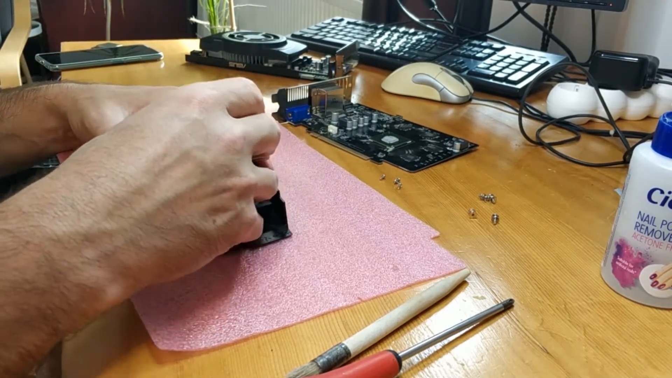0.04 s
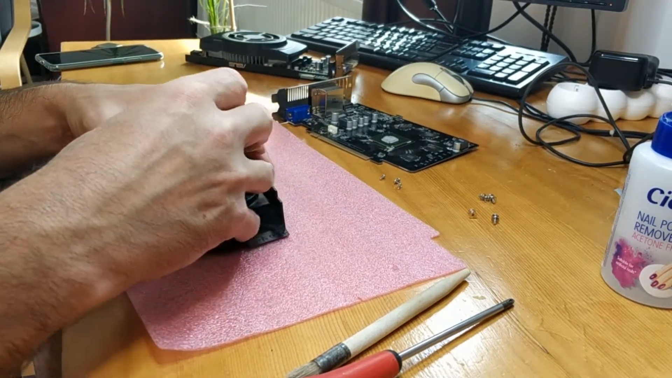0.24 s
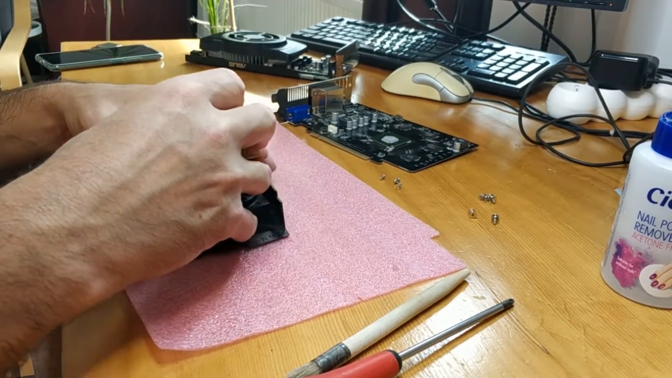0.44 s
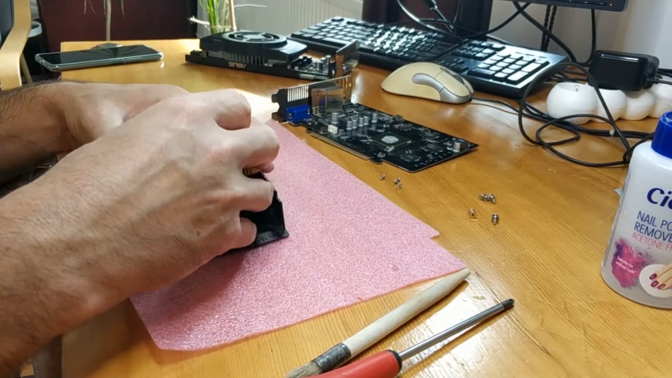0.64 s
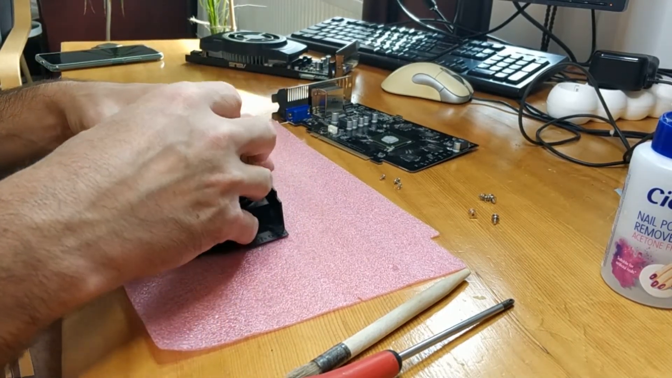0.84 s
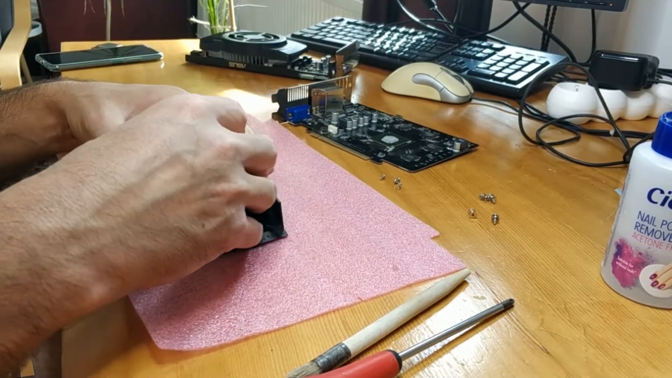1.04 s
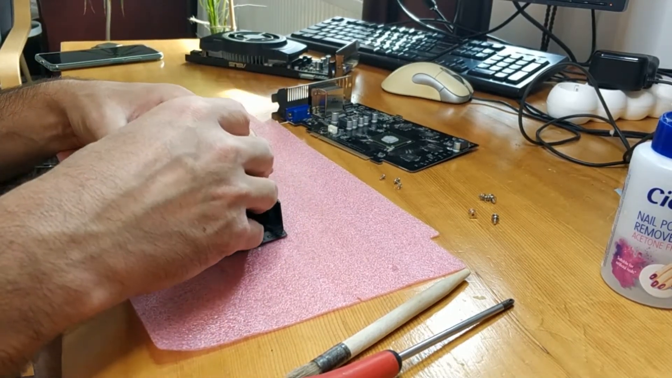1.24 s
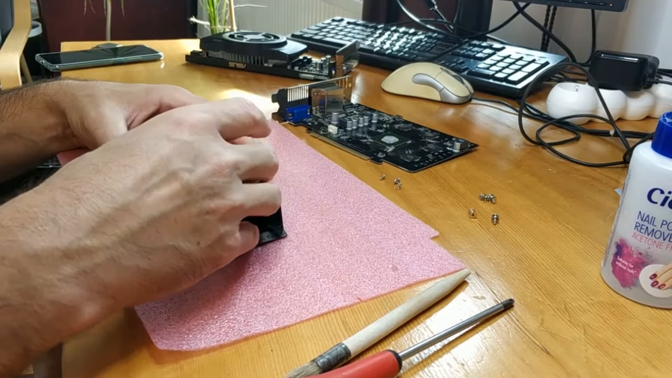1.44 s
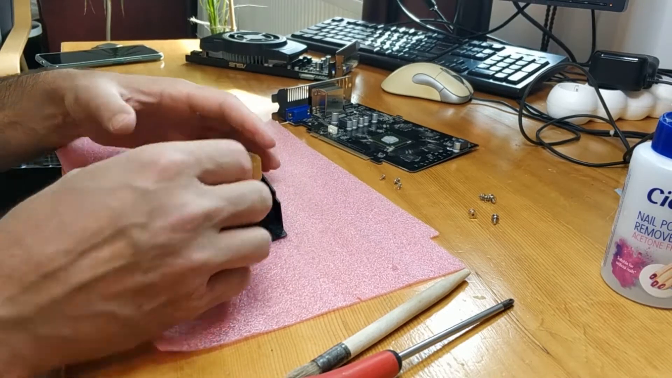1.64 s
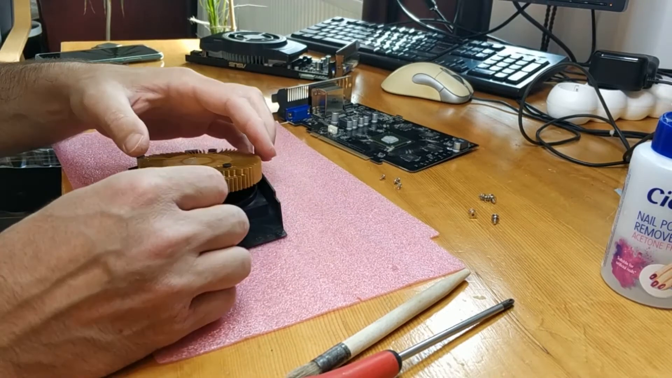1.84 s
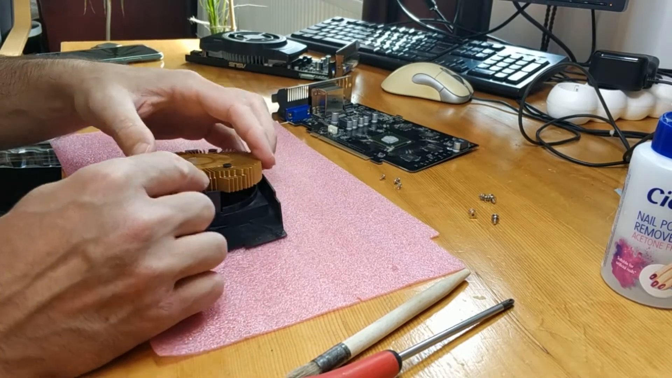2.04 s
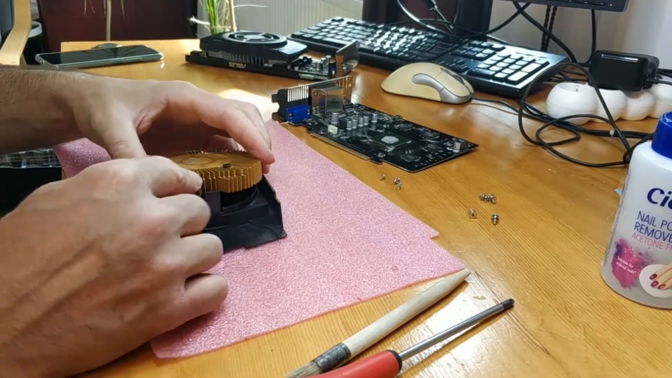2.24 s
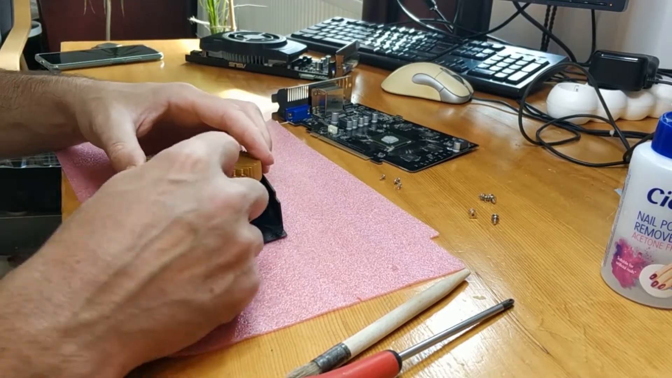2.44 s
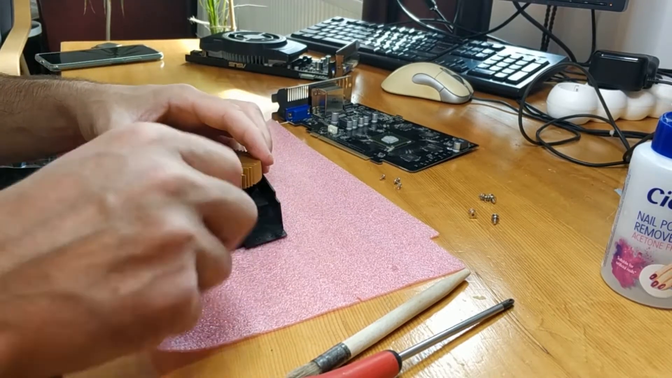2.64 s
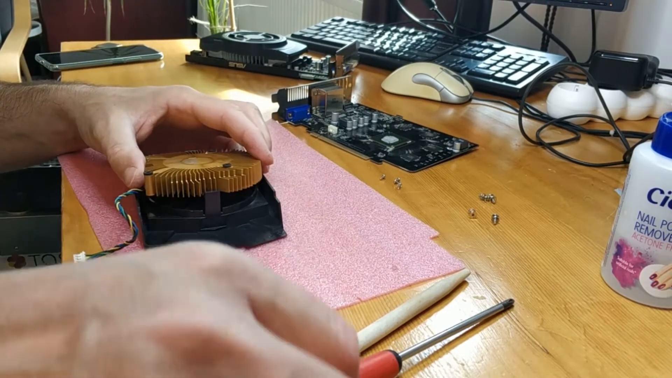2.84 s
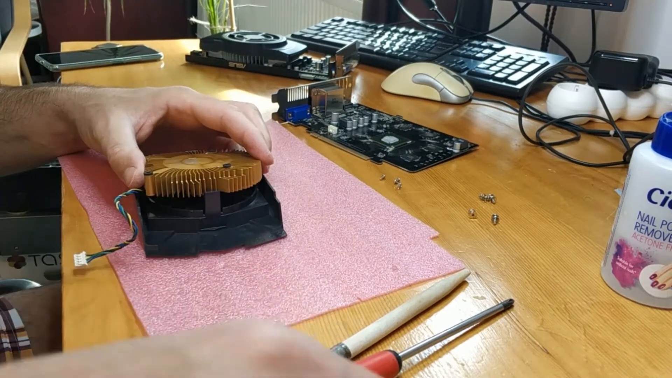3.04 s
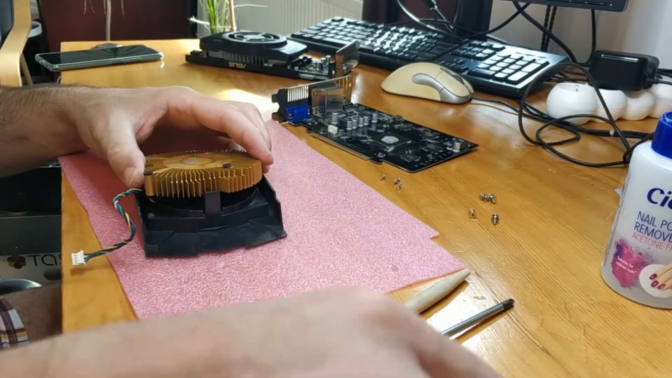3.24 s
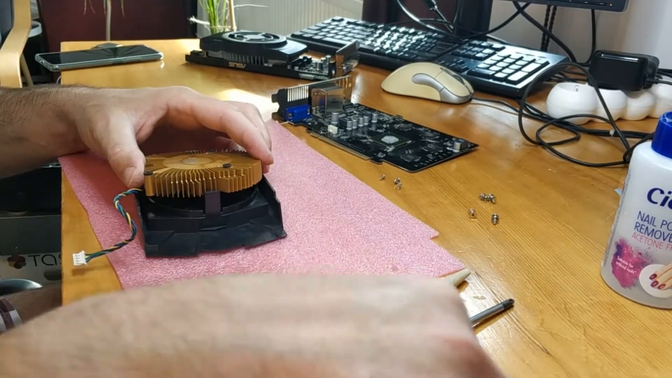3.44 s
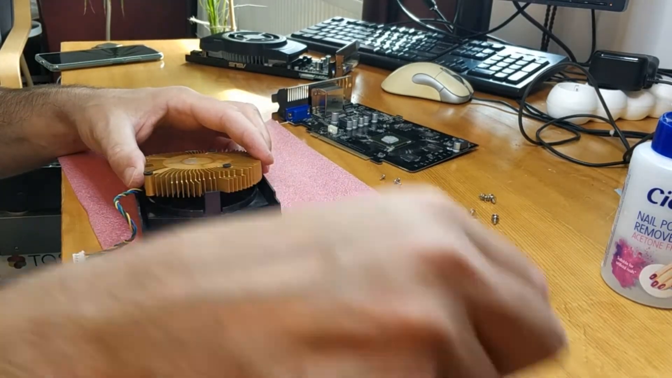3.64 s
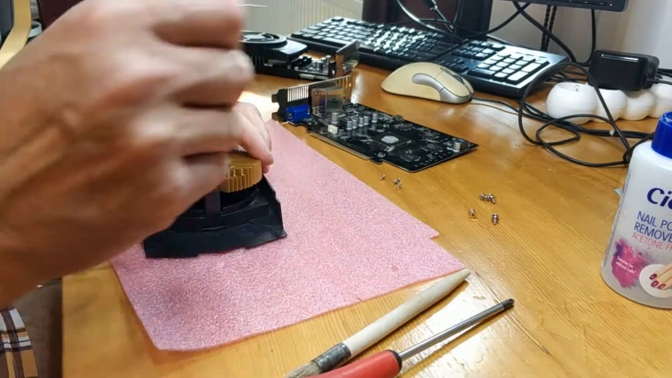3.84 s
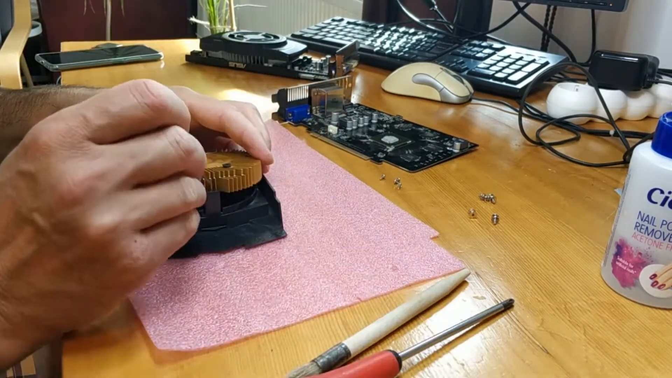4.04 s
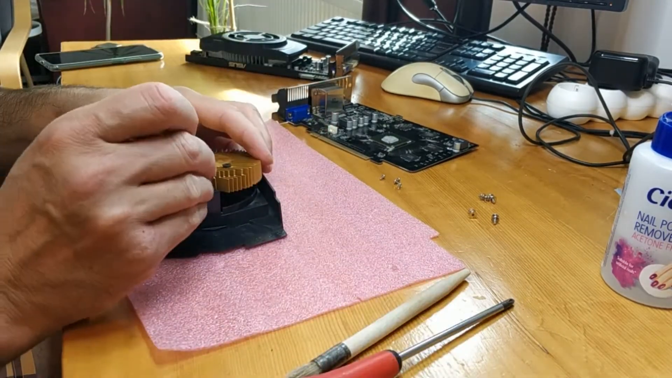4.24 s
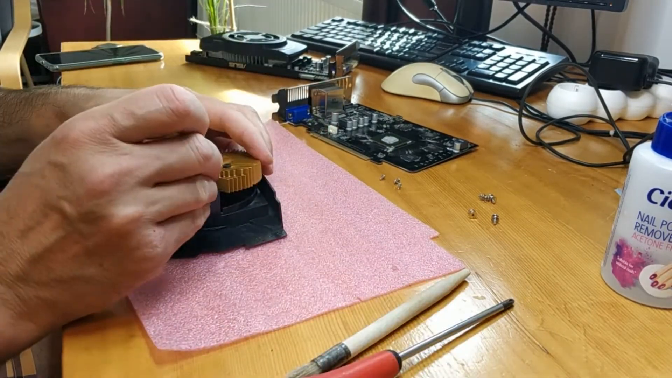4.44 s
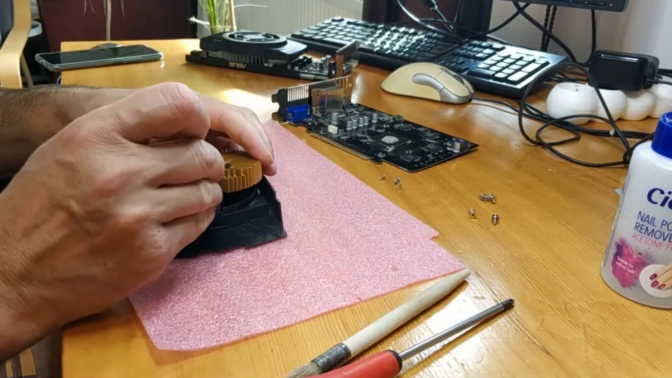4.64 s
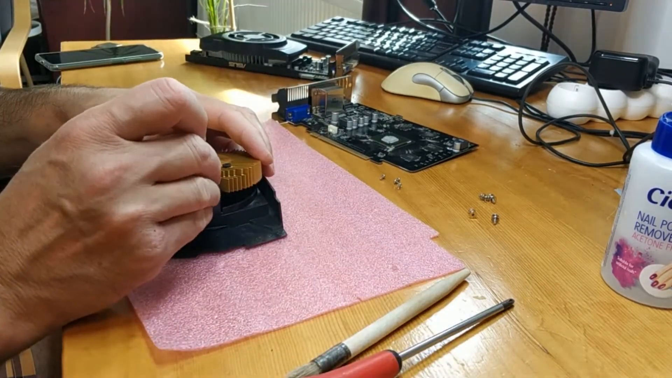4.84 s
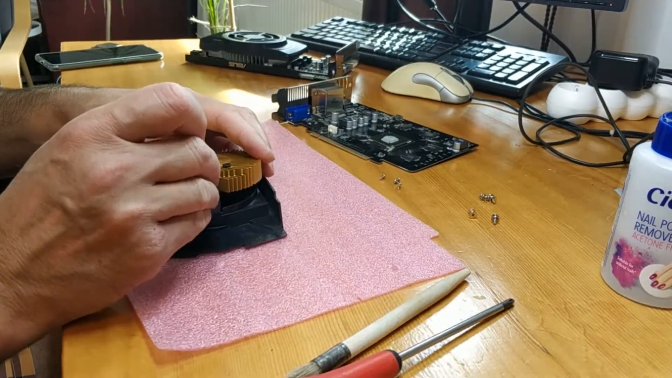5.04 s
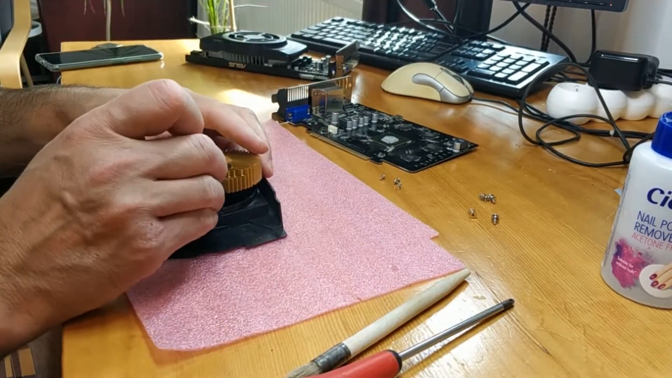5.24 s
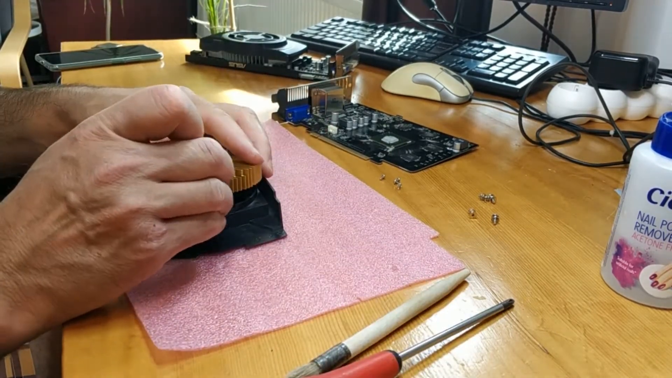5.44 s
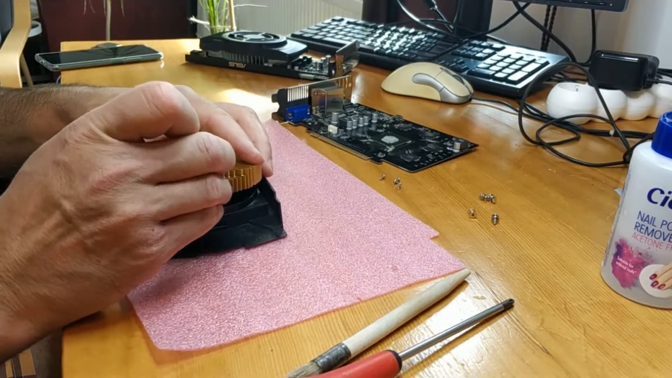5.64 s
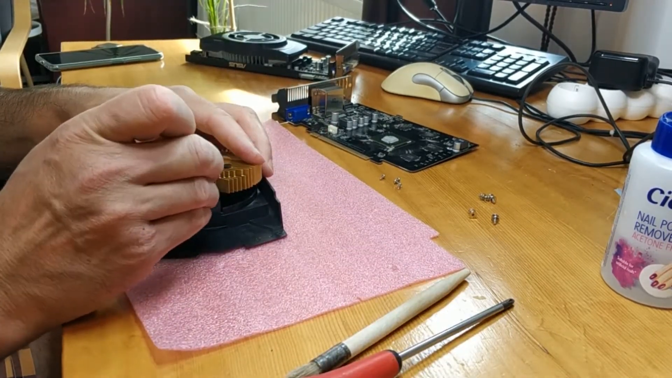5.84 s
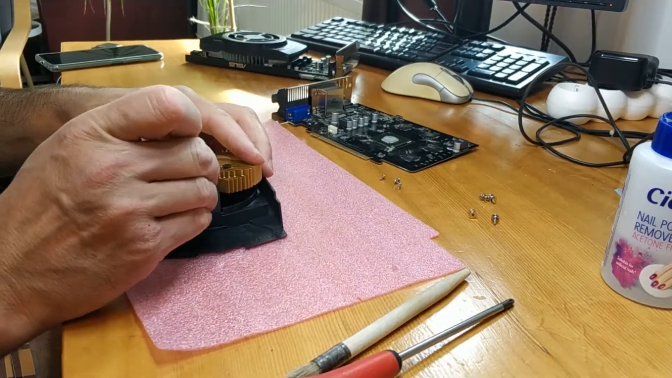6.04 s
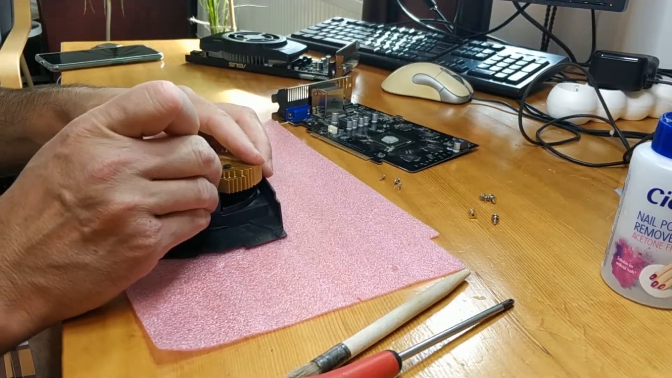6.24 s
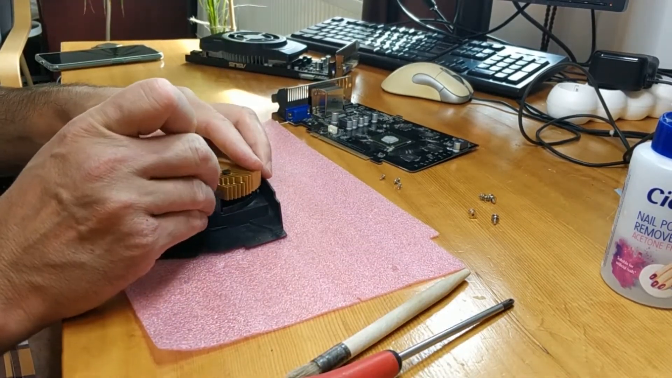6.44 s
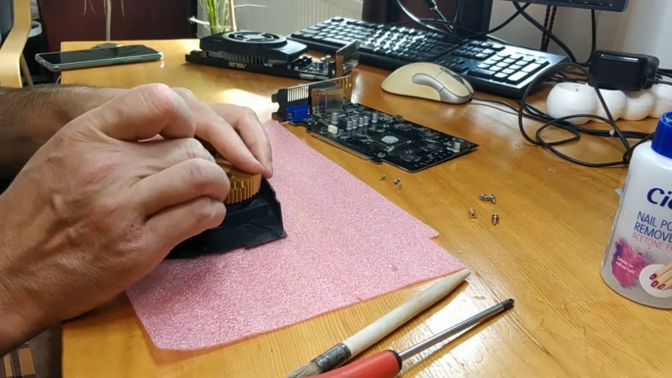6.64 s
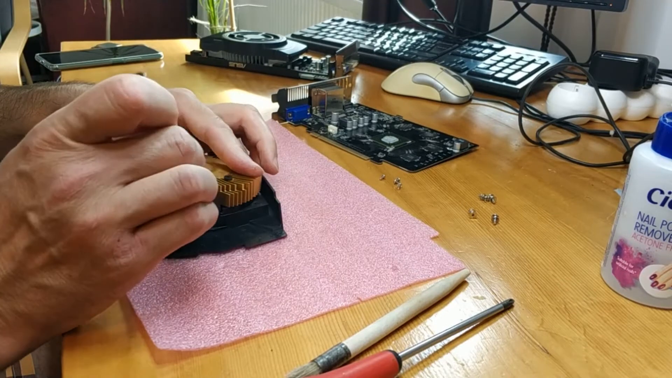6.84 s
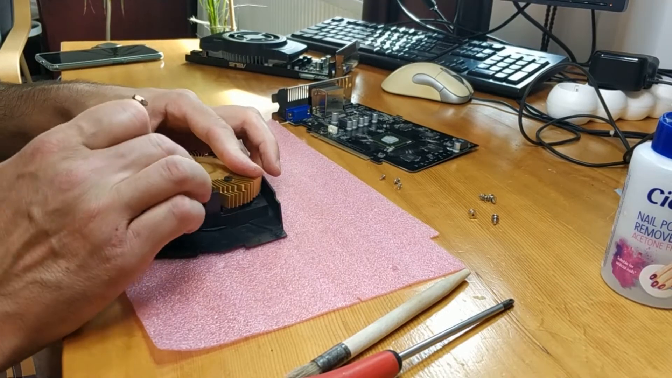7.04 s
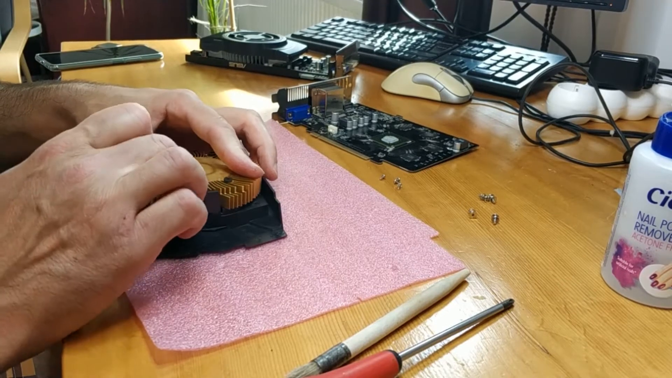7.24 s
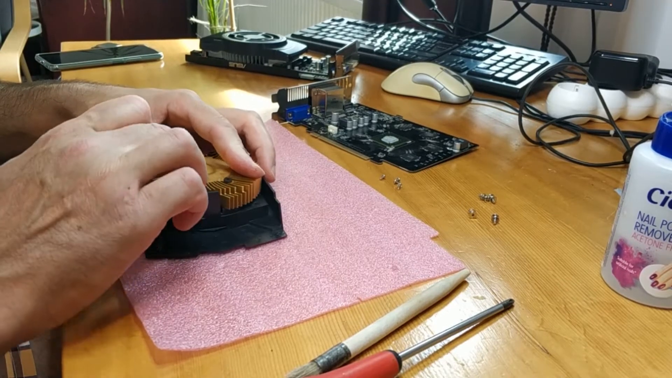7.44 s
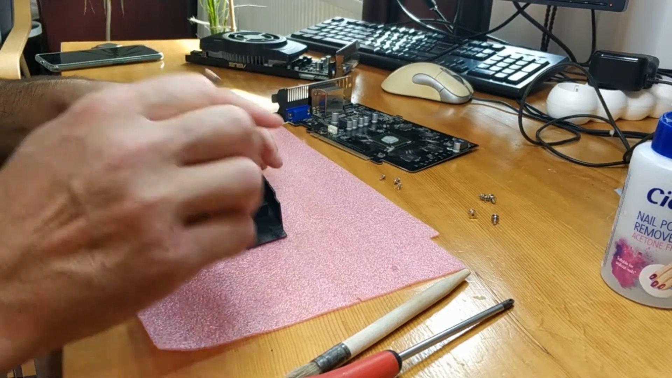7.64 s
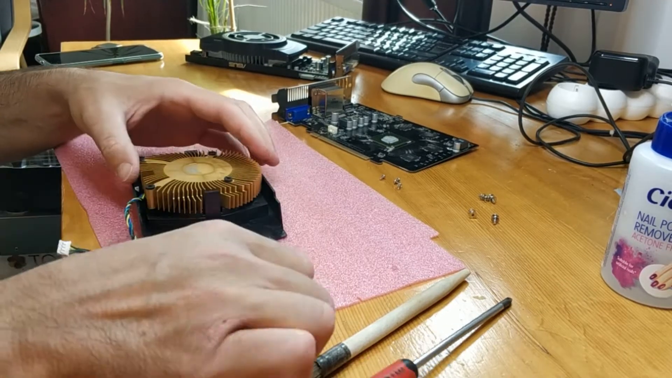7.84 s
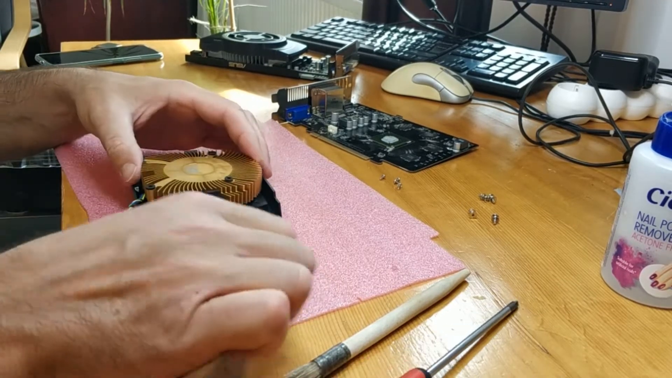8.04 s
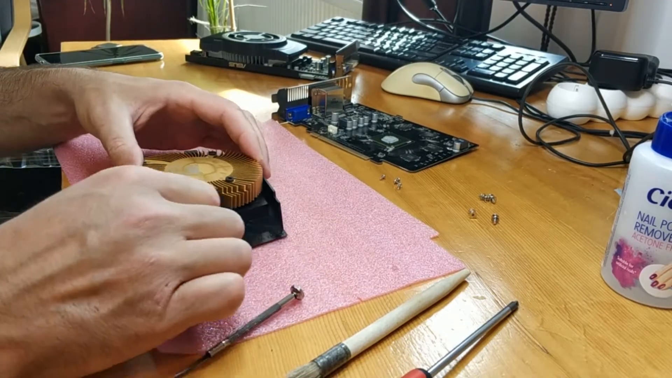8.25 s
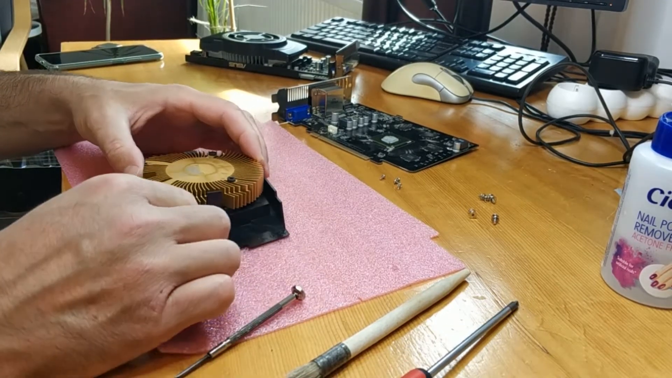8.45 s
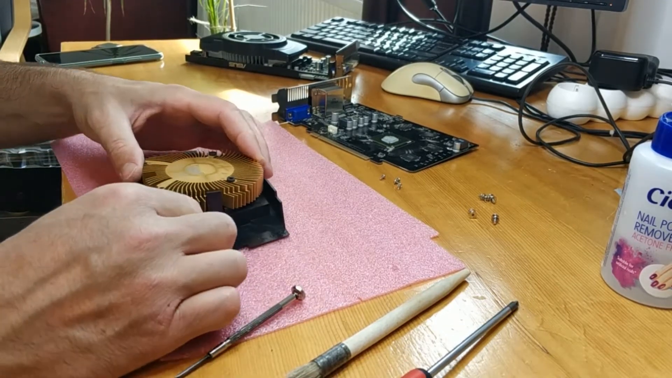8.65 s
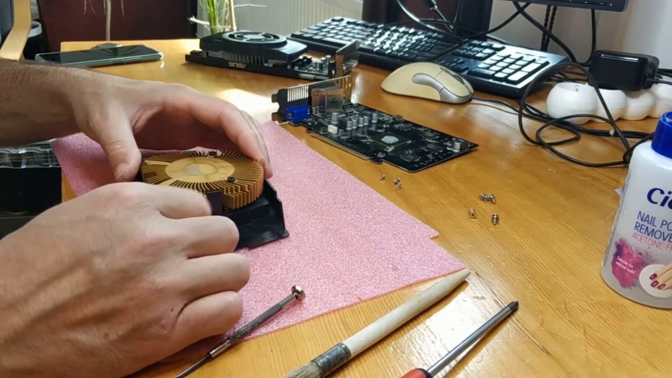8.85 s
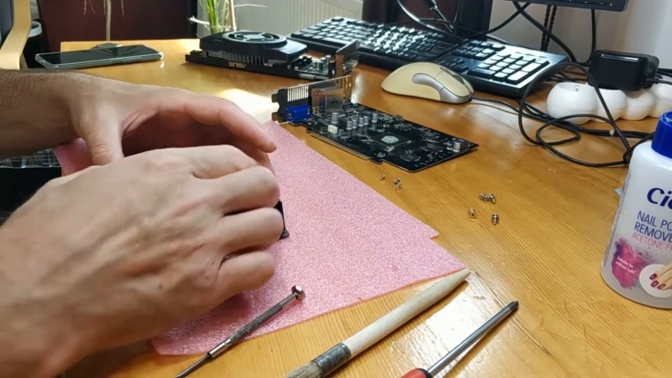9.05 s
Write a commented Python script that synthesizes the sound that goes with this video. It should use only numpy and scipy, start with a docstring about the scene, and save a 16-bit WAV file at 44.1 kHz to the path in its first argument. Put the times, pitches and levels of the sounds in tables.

```python
"""A quiet room hums around two spaced microphones while hands work at a plastic fan shroud and its metal
heatsink on a soft mat: skin rubs, clips snap, steel ticks and rings, and knocks thump through to the desk.
A faint whistle falls, then near 3.5 s a small screwdriver is picked up, its handle bumping and scraping.
More ticks and presses lead to the loudest snap at 7.2 s. Near 7.9 s the tool drops on the bare desk,
clatters and rocks to rest, and the fingers slide on softly."""
import sys
import numpy as np
from scipy import signal
from scipy.fft import rfft, irfft, next_fast_len
from scipy.io import wavfile
from scipy.ndimage import map_coordinates

SR = 44100
rng = np.random.default_rng(int(sys.argv[2]) if len(sys.argv) > 2 else 0)


def generate_wav(signal):
    """Clip the signal to [-1, 1] and save it as 16-bit WAV at the path in sys.argv[1]."""
    frames = np.transpose(np.atleast_2d(signal))
    scaled = np.clip(frames, -1, 1) * 32767
    pcm = np.round(scaled).astype(np.int16)
    wavfile.write(sys.argv[1], SR, pcm)


N = 401751
LEFT_LAG = 6  # samples by which the left microphone hears the work later
# hollow modes of the desk top and tool handle: pitch_hz, level_db, t60_s
HOLLOW_MODES = [(200, -6, 0.11), (310.5, -0.5, 0.047), (366.6, -22, 0.5), (555.4, -10.5, 0.076),
                (680, 6, 0.027), (843, -4, 0.05), (920, 0.5, 0.021), (1033, -4, 0.044), (1250, -7, 0.063),
                (1600, -16.5, 0.11), (1820, -14.5, 0.039), (2390, -9.5, 0.023), (3420, -23, 0.041)]


def amp(db):
    """Decibels to gain."""
    return 10 ** (np.asarray(db) / 20)


def unit(x):
    """Scales x to an rms of 1."""
    return x / np.sqrt(np.mean(x ** 2) + 1e-20)


def along(points, hz):
    """Reads a curve of (Hz, value) points on a log frequency axis."""
    freqs, values = np.transpose(points)
    return np.interp(np.log(hz + 1), np.log(freqs + 1), values)


def filtered(x, response):
    """Shapes x with a complex frequency response."""
    n = x.shape[-1]
    size = next_fast_len(n + 8192)
    return irfft(rfft(x, size) * response(np.fft.rfftfreq(size, 1 / SR)), size)[..., :n]


def peak(f, hz, width_hz):
    """The response of one causal resonance."""
    return 1j * f * width_hz / (hz * hz - f * f + 1j * f * width_hz)


def wobble(rate):
    """A smooth random curve with rate knots a second."""
    knots = rng.standard_normal(int(N * rate / SR) + 4)
    coarse = np.arange(0, N + 16, 16)
    return np.interp(np.arange(N), coarse, map_coordinates(knots, [coarse * rate / SR]))


def echo(x):
    """A fresh room tail for each event: every frequency dies at its own speed, and little bass returns."""
    # room decay: freq_hz, t60_s
    decay = [(200, 0.64), (1000, 0.23), (4000, 0.36), (8000, 0.32), (14000, 0.11)]
    hz, t = np.fft.rfftfreq(256, 1 / SR), np.arange(100) * 128 / SR
    real, imag = rng.standard_normal((2, 2, len(hz), len(t)))
    envelope = amp(-60 * t / along(decay, hz)[:, None]) * (hz / (hz + 500))[:, None]
    tail = signal.istft((real + 1j * imag) * envelope, SR, nperseg=256)[1]
    predelayed = np.pad(x, ((0, 0), (200, 0)))
    return signal.fftconvolve(predelayed, tail / np.linalg.norm(tail[0]), axes=1)


def place(out, start_s, pair, pan_db, room_db, lag=LEFT_LAG):
    """Mixes in a stereo event, its bounce off nearby things and its echo; positive pan is left."""
    at, n = round(start_s * SR), pair.shape[1]
    event = amp(room_db) * echo(pair)
    event[0, lag:lag + n] += amp(pan_db / 2) * pair[0]
    event[1, :n] += amp(-pan_db / 2) * pair[1]
    event[:, round(.0035 * SR):][:, :n] += amp(-7.5) * pair[::-1]  # the bounce swaps sides
    out[:, at:at + event.shape[1]] += event


def ring(modes, attack_s, strengths_db=0):
    """One blow on a set of decaying modes, each at a new strength, a little different on each side."""
    t = np.arange(SR // 4) / SR
    hz, db, t60 = np.transpose(modes)[:, :, None]
    scatter_db = rng.normal(0, 2, hz.shape) + rng.normal(0, 1.5, (len(modes), 2))
    gains = amp(db + np.reshape(strengths_db, (-1, 1)) + scatter_db)
    partials = amp(-60 * t / t60) * np.sin(2 * np.pi * hz * t)
    return gains.T @ partials * (1 - np.exp(-t / attack_s))


def strokes(rows, shares=1):
    """A gain envelope: each stroke swells, drifts from its first level to its last, and lets go."""
    attack_s, release_s, fade_db = 0.033, 0.056, 24.5
    gain = np.zeros(N)
    for (s, length, db, change_db, *_), share in zip(rows, shares * np.ones(len(rows))):
        times = [s - attack_s, s, s + length, s + length + release_s]
        levels_db = [db - fade_db, db, db + change_db, db + change_db - fade_db]
        at = np.arange(max(0, round(times[0] * SR)), min(N, round(times[-1] * SR)))
        gain[at] += share * amp(np.interp(at / SR, times, levels_db))
    return gain


def grit(spiky_db):
    """Dense stick-slip grains of uneven size; some slips stand out and reach both sides together."""
    slips = (rng.random(N) < 120 / SR) * rng.exponential(size=N)
    bursts = 1 + .7 * signal.fftconvolve(slips, np.exp(-np.arange(300) / 60))[:N]
    return unit(rng.standard_normal((2, N)) * bursts * amp(spiky_db * wobble(500) + 1.5 * wobble(30)))


def room_tone():
    """Rumble is largely shared by both microphones, hiss is not; a slightly unsteady hum sits on top."""
    # room rumble and microphone hiss: freq_hz, relative_db
    air = [(7.1, -31), (12, 15), (27, -6), (59, -8.5), (114, -10), (194, -12), (253, -17.5), (372, -22),
           (693, -28.5), (2130, -31.5), (2960, -32.5), (3860, -32), (9660, -30.5)]
    # likeness of left and right: freq_hz, correlation
    likeness = [(60, 0.74), (180, 0.76), (540, 0.41), (1640, 0), (4930, 0.053), (14800, 0.0085)]
    # fans and mains: pitch_hz, wander_hz, level_db
    hum_tones = [(38.7, 3.2, -68.5), (88.8, 1.42, -68.5), (121, 1.053, -68), (247.6, 0.474, -73),
                 (305.5, 0.65, -80.5)]

    def mid_and_side(hz):
        width = np.arccos(np.clip(along(likeness, hz), -1, 1)) / 2
        return amp(along(air, hz)) * [np.cos(width), np.sin(width)]

    mid, side = filtered(rng.standard_normal((2, N)), mid_and_side)
    out = amp(-60) * unit(np.array([mid + side, mid - side]))
    for hz, wander_hz, db in hum_tones:
        gain = amp(db + 1.26 * wobble(8.9))
        out += gain * np.sin(2 * np.pi * np.cumsum(hz + wander_hz * wobble(4.7)) / SR)
    return out


def whistle():
    """A faint, thin tone that slides down."""
    # the glide: time_s, pitch_hz, level_db
    glide = [(2.76, 11400, -71), (2.8, 11300, -77), (2.85, 10800, -78), (2.89, 10300, -84)]
    times, hz, db = np.transpose(glide)
    t = np.arange(N) / SR
    phase = 2 * np.pi * np.cumsum(np.interp(t, times, hz)) / SR
    return np.interp(t, times, amp(db), 0, 0) * np.sin(phase)


def finger_hiss():
    """A narrow hiss near 10 kHz while a finger slides."""
    # the slide: start_s, length_s, level_db, change_db
    slide = [(8.52, .3, -64, -10)]
    hiss = filtered(rng.standard_normal((2, N)), lambda f: peak(f, 10000, 500) ** 2)
    return strokes(slide) * unit(hiss)


def finger_rubs():
    """Dry skin hisses high; a firmer grip drags the shroud and sounds duller."""
    # fingers sliding: start_s, length_s, level_db, change_db, firmness (0-1)
    rubs = [(0, 0.071, -52.5, -5.5, 0.55), (0.113, 0.067, -60, -3, 0.09), (0.284, 0.066, -63, -3, 0.28),
            (0.552, 0.027, -57, -4, 0.6), (0.924, .09, -72.5, 8, 0.26), (1.534, 0.11, -64, 1.5, 0.1),
            (1.693, 0.034, -50.5, -4.5, 0.02), (1.765, 0.03, -55, -1.5, 0.02),
            (1.982, 0.052, -65, -2.5, 0.17), (2.051, 0.097, -57.5, -3.5, 0.02),
            (2.31, 0.061, -54, 2.5, 0.08), (2.399, .14, -52.5, -8, 0.06), (3.494, 0.054, -59.5, -6, 0.1),
            (3.65, 0.12, -66, 6, 0.36), (4.7, 0.025, -64, 1.5, 0.3), (5.22, 0.07, -70.5, 1.5, 0.76),
            (5.428, 0.092, -70, 4, 0.65), (6.432, 0.078, -50, -17, 0.94), (6.526, 0.052, -67, 4, 0.43),
            (6.702, 0.041, -64, 4.5, 0.7), (6.956, 0.065, -58.5, -8, 0.2), (7.583, 0.12, -62.5, 5, 0.02),
            (7.734, 0.21, -50.5, -15, .05), (8.003, .02, -38, -4, 0.2), (8.323, 0.081, -51.5, -3, 0.01),
            (8.453, 0.85, -59.5, -10, 0.07), (8.889, 0.12, -67.5, 13.5, .03)]
    # colour of dry skin: freq_hz, relative_db
    skin_colour = [(290, -58), (500, -42), (1960, -22), (2160, -45), (2380, -26.5), (3730, -21),
                   (8930, -6.5), (14400, -14)]
    # colour of dragged plastic: freq_hz, relative_db
    plastic_colour = [(240, -27), (400, 6.5), (1590, 0), (1900, 4), (3310, 3.5), (3570, 7), (8020, 5),
                      (14400, -18)]
    skin = unit(filtered(grit(spiky_db=-1.0), lambda f: amp(along(skin_colour, f))))
    plastic = unit(filtered(grit(spiky_db=2.2), lambda f: amp(along(plastic_colour, f))))
    firmness = np.clip(np.transpose(rubs)[-1], 0, 1)
    return strokes(rubs, np.sqrt(1 - firmness)) * skin + strokes(rubs, np.sqrt(firmness)) * plastic


def handle_scrapes():
    """The handle scraping over the desk keeps the hollow modes alive."""
    # scrapes: start_s, length_s, level_db, change_db
    scrapes = [(3.47, 0.34, -66.5, -2), (8.08, 0.31, -49.5, -16.5)]

    def hollow(f):
        return sum((-1) ** k * amp(db) * peak(f, hz, 120) for k, (hz, db, _) in enumerate(HOLLOW_MODES))

    mid, side = grit(spiky_db=-0.5)
    friction = np.array([mid + .5 * side, mid - .5 * side])
    return strokes(scrapes) * unit(filtered(friction, hollow))


def ringing_parts():
    """Fins, screw, shroud wall and tool shaft ring after a touch; a nearby hand makes the first two waver."""
    # modes of each part: pitch_hz, level_db, t60_s
    fin_modes = [(1384, 0, .6), (6380, 0, .2), (7420, 0, .25)]
    screw_modes = [(1755, -18, .5), (5173, -20, .3), (9092, 0, .2)]
    wall_modes = [(1713, 3.5, 0.014), (1956, 5, 0.029)]
    shaft_modes = [(4300, -14, .008), (5400, -11, .012), (7370, -3, .016), (7530, -3, .016),
                   (7700, -2, .016), (8020, -2, .016), (8350, 0, .016), (8600, 0, .016), (8850, -1, .016),
                   (9200, -5, .016), (12010, -2, .025), (11950, -24, .16), (12070, -25, .14)]
    # fin touches, coloured by where they land: start_s, then level_db for each of the three modes
    fin_hits = [(2.309, -100, -90, -61), (4.631, -100, -77, -62), (5.12, -71.5, -90, -62),
                (7.571, -69, -55, -63)]
    # touches on the other parts: start_s, level_db
    screw_hits = [(1.497, -52)]
    wall_hits = [(1.029, -30.5), (4.926, -67), (5.099, -65), (6.738, -52), (7.238, -51)]
    shaft_hits = [(8.027, -15)]
    steady, wavering = np.zeros((2, 2, N + SR))
    for bus, modes, hits, attack_s, room_db in ((wavering, fin_modes, fin_hits, .004, -9),
                                                (wavering, screw_modes, screw_hits, .0006, -9),
                                                (steady, wall_modes, wall_hits, .001, -6),
                                                (steady, shaft_modes, shaft_hits, .0004, -10)):
        for s, *db in hits:
            place(bus, s, ring(modes, attack_s, db), pan_db=0, room_db=room_db)
    return steady[:, :N] + wavering[:, :N] * amp(3.7 * wobble(45))


def knocks(blows, modes, pan_db, room_db, lag, thump_delay_s):
    """Each blow rings the struck thing and thumps the whole desk, the thump alike on both sides."""
    # low modes of the whole desk: pitch_hz, level_db, t60_s
    desk_modes = [(101.7, 4.5, 0.11), (120.7, 6, 0.08), (174.3, 3.5, 0.059)]
    out = np.zeros((2, N + SR))
    octaves = np.log2(np.transpose(modes)[0] / 800)
    for s, knock_db, thump_db, *hardness in blows:
        tilt_db = sum(hardness) * octaves  # harder blows are brighter
        place(out, s, amp(knock_db) * ring(modes, 0.0016, tilt_db), pan_db, room_db, lag)
        thump = amp(thump_db) * ring(desk_modes, attack_s=0.012)[0]
        out[:, round((s + thump_delay_s) * SR):][:, :len(thump)] += thump
    return out[:, :N]


def shroud_knocks():
    """The shroud is pressed or jolted: a short, damped knock with a low desk thump."""
    # presses and jolts: start_s, knock_db, thump_db
    jolts = [(0.445, -49, -41.5), (0.569, -57.5, -53.5), (1.029, -40, -35.5), (1.09, -53.5, -41),
             (5.264, -63, -47.5), (5.525, -51.5, -45.5), (5.715, -64, -58), (5.88, -65, -62),
             (5.772, -56.5, -58), (6.345, -58, -43), (6.403, -58, -48.5), (6.528, -56, -54),
             (6.735, -58, -53), (7.236, -39.5, -36), (7.565, -56.5, -51)]
    # damped plastic: pitch_hz, level_db, t60_s
    shroud_modes = [(288, -10.5, 0.054), (425, -7, 0.021), (468, 7, 0.035), (586, 3, 0.03),
                    (755, -14.5, 0.045), (910, 8.5, 0.012), (1223, -11.5, 0.057), (1250, -28.5, 0.09)]
    return knocks(jolts, shroud_modes, pan_db=1.5, room_db=-0.5, lag=LEFT_LAG, thump_delay_s=0.0048)


def handle_rocking():
    """The handle rocks to rest, its taps coming ever faster and weaker."""
    # bouts of rocking: start_s, knock_db, tap_count
    bouts = [(7.826, -54.5, 1), (8.182, -39, 6)]
    # the handle alone: pitch_hz, level_db, t60_s
    handle_modes = [(660, -7, .05), (840, 0, .06), (930, -1, .05), (1590, -9, .04), (1780, -8, .045)]
    least_gap_s, extra_gap_s, shrink = .018, .025, .45
    loss_db, thump_under_db = 0.75, 10
    taps = []
    for start_s, db, count in bouts:
        for k in range(round(count)):
            s = start_s + least_gap_s * k + extra_gap_s * (1 - shrink ** k) / (1 - shrink)
            taps.append((s, db - loss_db * k * k, db - thump_under_db))
    return knocks(taps, handle_modes, pan_db=-6, room_db=0, lag=0, thump_delay_s=0)


def handle_bumps():
    """The handle hits the bare desk with a hollow knock, a little louder on the left."""
    # pick-up and drop: start_s, knock_db, thump_db, hardness_db_per_octave
    bumps = [(3.47, -55, -54, -2), (3.485, -50.5, -52, -3), (3.496, -42.5, -35.5, -1.5),
             (3.517, -42.5, -55, 1), (3.551, -47.5, -48.5, 0), (3.626, -53.5, -55, -2),
             (3.68, -54, -52, -1), (3.707, -48.5, -55, 2), (3.75, -51, -59, 0.5), (7.9015, -27.5, -33, 0.5),
             (7.919, -35.5, -39.5, 4), (7.991, -29, -47, 3), (8.009, -27.5, -43, 3.5),
             (8.029, -46, -59, -.5), (8.076, -58, -42, -4), (8.132, -41.5, -42, -.5), (8.147, -40, -50, 2)]
    return knocks(bumps, HOLLOW_MODES, pan_db=4.0, room_db=0.5, lag=0, thump_delay_s=0.0052)


def snaps():
    """Each snap is a few milliseconds of chattering contact, coloured by the part that slips."""
    # clip snaps and steel ticks: start_s, level_db, pitch_hz, shroud_body_db, pan_db
    hits = [(0.2258, -54.5, 7100, -28, -2), (0.326, -49, 6800, -33, -1), (0.353, -54.5, 6400, -28, 3),
            (0.447, -46, 7100, 2.5, -2), (0.567, -44, 5670, -6.5, -4), (1.029, -29, 5730, 5, -1.5),
            (1.0904, -28.5, 2940, -6.5, 1), (1.4995, -55, 9100, -30, -3), (2.421, -47.5, 10100, -13, 4),
            (3.481, -53, 10500, -21, 10), (3.497, -45, 4970, -1, 3), (3.5176, -44.5, 11800, -6.5, 6),
            (3.5927, -48, 12400, -28, 14), (3.767, -47, 11900, -21, 5), (3.87, -47, 12300, -26, 15),
            (4.628, -39, 10340, -38, 3), (4.6987, -53, 5200, -29, -4), (4.7214, -53.5, 4860, -26, 2),
            (4.9168, -59.5, 5880, 10, -2), (4.927, -57, 6250, -25, -6), (5.0988, -50, 6160, -11, -3),
            (5.3797, -54.5, 6800, -11, 1), (5.5259, -32, 7980, -24, 1), (5.76, -57, 8000, 2, 0),
            (5.777, -58.5, 8160, 1, -1), (6.1483, -49, 6400, -20, 9.5), (6.2555, -49.5, 7560, -3, -2),
            (6.3432, -58.5, 3520, -11, -0.5), (6.409, -55.5, 4700, 4, -6), (6.425, -49.5, 6900, -24, 19),
            (6.57, -49, 7200, -16, -1), (6.7334, -44, 6200, -1.5, -4), (6.7374, -32, 7550, -23.5, 8),
            (6.9237, -47.5, 11600, -29, 4), (7.2366, -19.5, 3960, 0.5, 5), (7.5646, -48.5, 11800, -10, -3),
            (7.9204, -26.5, 2950, 18, -5), (7.9963, -30, 3000, 0, -4), (8.0065, -31.5, 6600, 11, 3),
            (8.0263, -31, 11300, -37, 15.5), (8.1404, -42.5, 2980, 9, -1)]
    chatter_t60_s, rise_s, thin_hz = 0.024, 0.0009, 7600
    out, t = np.zeros((2, N + SR)), np.arange(3000) / SR
    for s, db, hz, body_db, pan_db in hits:
        thin_octaves = max(0, np.log2(hz / thin_hz))  # small steel ticks are shorter and lose their mids
        t60 = chatter_t60_s * 0.57 ** thin_octaves
        middle_db = -1 - 65 * thin_octaves
        shared, own = rng.standard_normal(len(t)), rng.standard_normal((2, len(t)))
        envelope = amp(-60 * t / t60) * (1 - np.exp(-t / rise_s))
        chatter = (0.69 * shared + 0.72 * own) * envelope  # the part radiates unevenly: sides differ

        def colour(f):
            main = peak(f, hz, 0.31 * hz) ** 2
            body = peak(f, 2560, 6100) ** 2 + peak(f, 2020, 260) + 1.05 * peak(f, 3030, 500)
            middle = peak(f, 5200, 4900) ** 2
            top = peak(f, 14500, 4300) ** 2
            return main + amp(body_db) * body + amp(middle_db) * middle + amp(-17) * top

        snap = filtered(chatter, colour)
        rms = np.linalg.norm(snap) / np.sqrt(t60 * SR / 4)
        place(out, s, amp(db) * snap / rms, pan_db, room_db=-8.0)
    return out[:, :N]


def scene():
    """Everything that reaches the two microphones."""
    shroud, bumps = shroud_knocks(), handle_bumps()
    rattle = amp(1.5 * wobble(160))  # the loose tool keeps brushing the wood, which roughens its ring
    impacts = snaps() + shroud + rattle * (bumps + handle_rocking()) + ringing_parts()
    friction = finger_rubs() + finger_hiss() + handle_scrapes()
    return impacts + friction + whistle() + room_tone()


def record(dry):
    """The top treble drops steeply, and nothing passes above the band limit."""
    edge_hz, limit_hz = 14220, 15400

    def high_cut(hz):
        loss_db = np.clip((hz - edge_hz) / 6, 0, 30) + np.clip((hz - edge_hz) / 60, 0, 20)
        return amp(-loss_db) * (hz < limit_hz)

    return filtered(dry, high_cut)


dry = scene()
out = record(dry)
generate_wav(out)
```